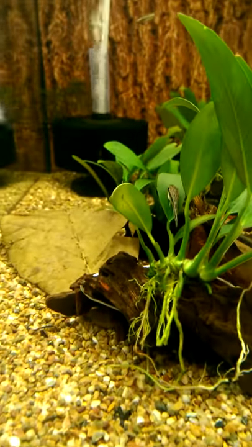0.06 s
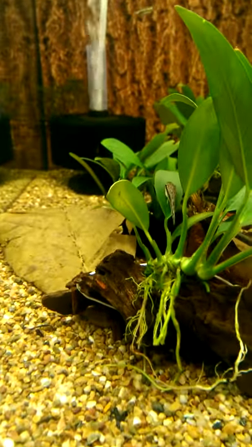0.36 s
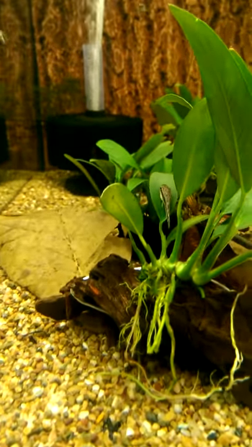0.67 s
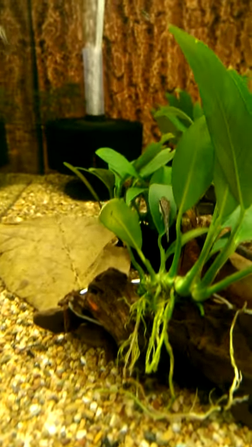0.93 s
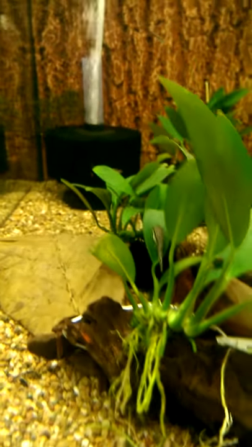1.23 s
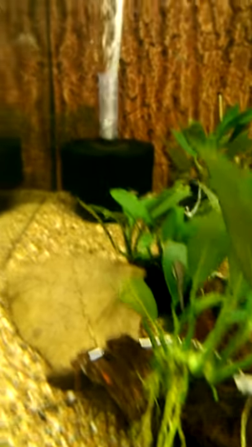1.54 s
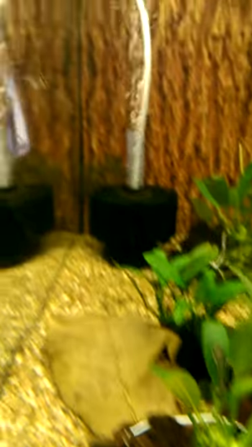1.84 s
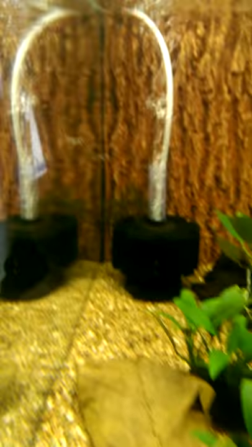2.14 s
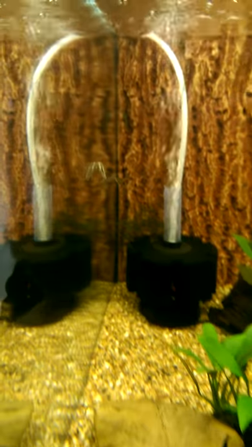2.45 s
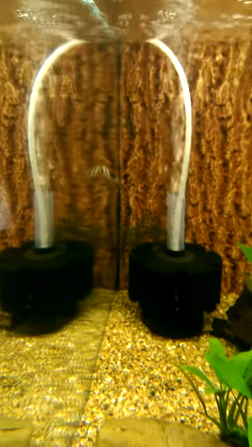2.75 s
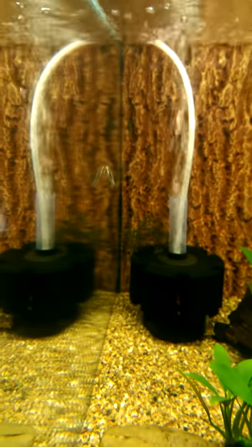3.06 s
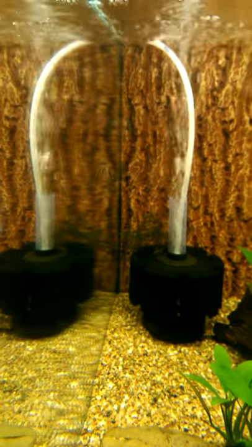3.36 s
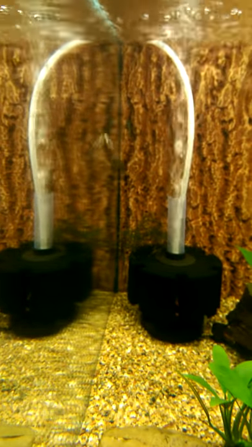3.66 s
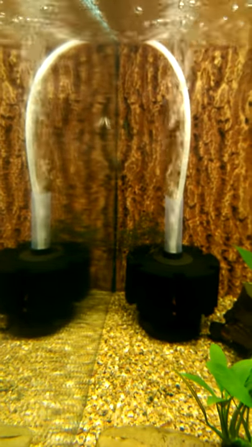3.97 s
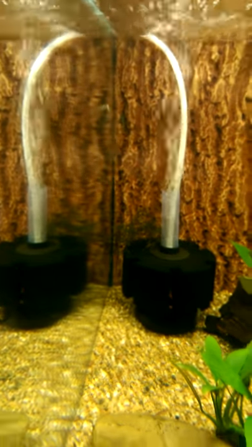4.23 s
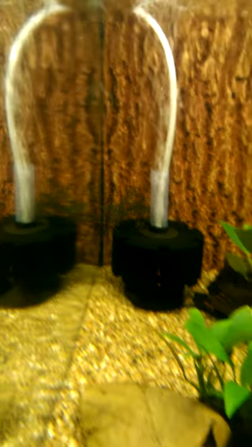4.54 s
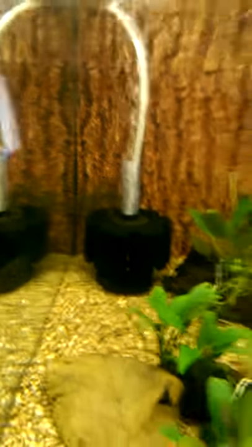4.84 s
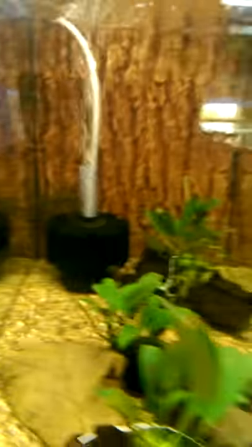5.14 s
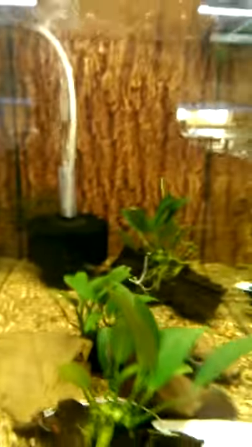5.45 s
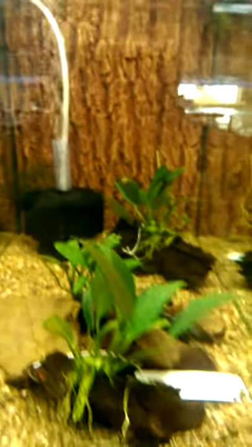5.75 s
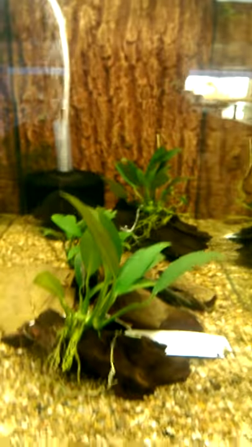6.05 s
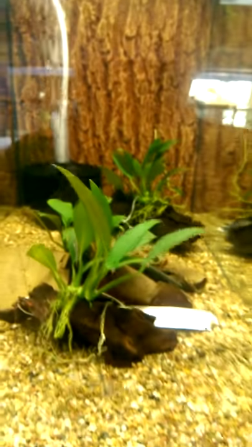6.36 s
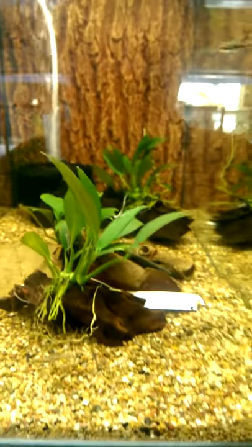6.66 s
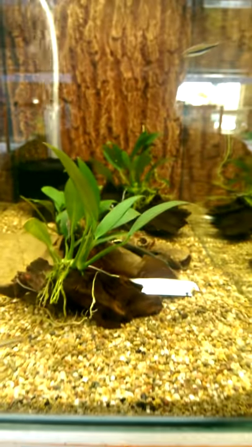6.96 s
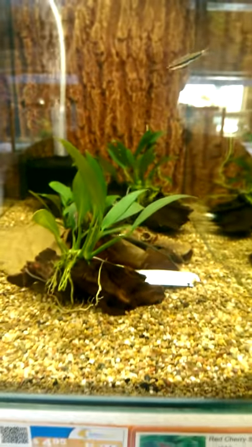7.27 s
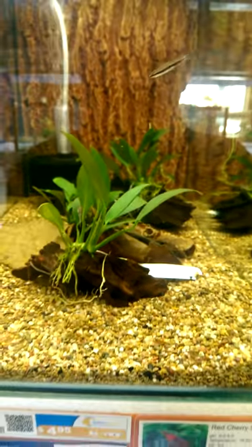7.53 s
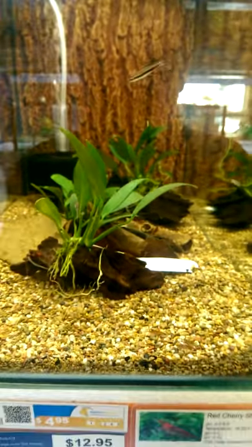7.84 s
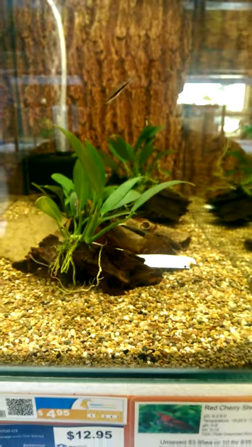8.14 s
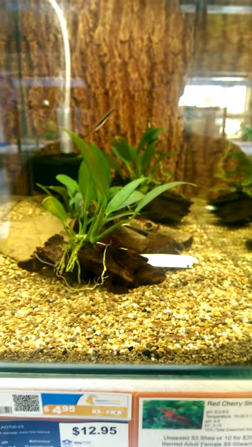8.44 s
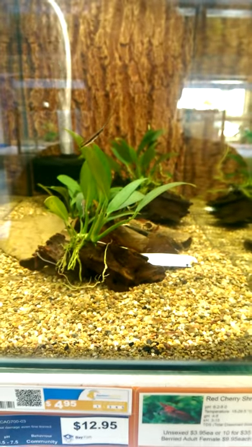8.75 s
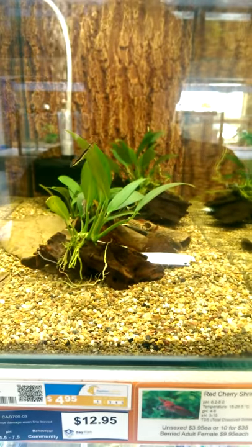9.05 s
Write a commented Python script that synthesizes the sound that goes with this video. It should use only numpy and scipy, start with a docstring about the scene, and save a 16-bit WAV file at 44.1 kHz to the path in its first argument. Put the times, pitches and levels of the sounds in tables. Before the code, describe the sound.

Continuous bubbling and soft splashing in fish tanks over a low, buzzy pump hum, with occasional finger clicks on the microphone.

```python
"""Tanks in a fish shop

Air pumps and filters hum, and their loose housings buzz. Air bubbles ring in the tanks and fizz at
the surface. A hand-held phone nears a tank's glass and draws back. A finger muffles its left
microphone port, lifts for a while and scuffs the case. Near the end a low engine note climbs,
as of a vehicle outside."""
import sys
import numpy as np
from scipy import signal
from scipy.fft import rfft, irfft, next_fast_len
from scipy.io import wavfile
from scipy.ndimage import map_coordinates

SR = 44100
rng = np.random.default_rng(int(sys.argv[2]) if len(sys.argv) > 2 else 0)


def store_pcm(level_fs):
    """Save levels as 16-bit WAV."""
    pcm = np.round(np.clip(level_fs, -1, 1) * 32767).astype(np.int16)
    wavfile.write(sys.argv[1], SR, np.atleast_2d(pcm).T)


N = 401310
TOP_HZ = 15800  # the highest pitch the phone keeps
# Tone colour of skin sliding on the phone: pitch_hz, level_db
SKIN_SPECTRUM = [(1000, -27), (3500, -13), (6000, -10), (11000, -18), (12650, -3.5), (13700, -10),
                 (16000, -12.5)]


def amp(db):
    """Turn decibels into a gain to multiply by."""
    return 10 ** (np.asarray(db) / 20)


def unit(x):
    """Scale x to an average power of 1."""
    return x / np.sqrt(np.mean(x ** 2) + 1e-20)


def clock():
    """The time of every sample, in seconds."""
    return np.arange(N) / SR


def along(points, hz):
    """Read between (pitch_hz, value) points on a logarithmic pitch scale."""
    pitches, values = np.transpose(points)
    return np.interp(np.log(hz + 1), np.log(pitches + 1), values)


def curve(points):
    """Join (time_s, value) points with straight lines, one value per sample."""
    return np.interp(clock(), *np.transpose(points))


def wobble(rate):
    """A smooth curve through `rate` random values a second."""
    return map_coordinates(rng.standard_normal(int(N * rate / SR) + 4), [clock() * rate])


def filtered(x, response):
    """Scale each frequency in x by response(hz)."""
    size = next_fast_len(N + SR // 2)
    return irfft(rfft(x, size) * response(np.fft.rfftfreq(size, 1 / SR)), size)[..., :N]


def coloured(x, spectrum):
    """Give x a tone colour, at an average power of 1."""
    return unit(filtered(x, lambda hz: amp(along(spectrum, hz))))


def diffuse(pair, spectrum):
    """Blend two noises into sound from all around: the ports hear alike only in the bass."""
    # How alike left and right are: pitch_hz, likeness (1 = the same)
    likeness = [(100, 0.79), (250, 1), (450, 0.87), (700, 0.38), (1300, 0.02), (16000, 0.15)]

    def weights(hz):
        angle = np.arccos(np.clip(along(likeness, hz), -1, 1)) / 2
        return np.array([np.cos(angle), np.sin(angle)])

    mid, side = filtered(pair, weights)
    return coloured(np.array([mid + side, mid - side]), spectrum)


def room_rumble(level_db):
    """A low, gently wavering noise fills the shop."""
    # Tone colour of the rumble: pitch_hz, level_db
    spectrum = [(15, -21), (33, -19), (46, -5), (60, -6.5), (78, -2.5), (100, -4.5), (135, -6), (180, -4.5),
                (255, -9), (330, -7.5), (420, -8), (540, -19), (900, -48.5)]
    return amp(level_db + 0.83 * wobble(5)) * diffuse(rng.standard_normal((2, N)), spectrum)


def vehicle(climb_hz_per_s):
    """A far engine gathers speed; only its two lowest tones pass the walls."""
    # How the engine swells and fades: time_s, level_db
    loudness = [(5.7, -80), (6.8, -50), (7.25, -54), (7.5, -43.5), (8.2, -54.5), (8.6, -75)]
    firing_hz = 71.4 + climb_hz_per_s * (clock() - 6.4)
    phase = 2 * np.pi * np.cumsum(firing_hz) / SR + 0.19 * wobble(8.8)
    return np.sqrt(2) * amp(curve(loudness)) * (np.sin(phase) + amp(-11.5) * np.sin(2 * phase))


def creep(ticks_per_s):
    """The grip creeps on the case in tiny ticks, louder once the hand has shifted."""
    ticks = (rng.random(N) < ticks_per_s / SR) * rng.standard_normal(N)
    level_db = curve([(4.7, -79), (5.2, -72)]) + 1.6 * wobble(10)
    return amp(level_db) * coloured(ticks, SKIN_SPECTRUM)


def stroke(peak_s, db, rise_s, fade_s):
    """A loudness curve that swells, then dies away. Every fade_s is the time to fall 60 dB."""
    t = clock()
    away = np.maximum((peak_s - t) / rise_s, (t - peak_s) / fade_s)
    return amp(db - 60 * np.minimum(away, 2))


def scuffs():
    """Skin drags on the phone: dull rubs on the case, thin hisses at the right port's rim."""
    # A finger catches and rubs: peak_s, level_db, rise_s, fade_s
    rub_strokes = [(1.296, -48, 0.03, 0.17), (1.378, -54.5, .06, 0.69), (1.497, -56, 0.11, 0.33),
                   (1.57, -60.5, .04, 0.87), (6.1, -59, 0.5, 0.79)]
    # Skin slips at the rim: peak_s, level_db, rise_s
    slip_strokes = [(2.31, -60, .01), (3.432, -63, .012), (5.65, -65, .02), (6.083, -51, 0.21)]
    # Tone colour of the rubbed case: pitch_hz, level_db
    case_spectrum = [(500, -26), (1700, -2), (2100, 2), (2560, 11), (2950, -1), (3300, -4), (3900, -7),
                     (4650, -3), (5400, -10), (6500, -16), (12000, -18)]
    grip = amp(2.0 * wobble(400))
    rubs = sum(stroke(*row) for row in rub_strokes)
    slips = sum(stroke(*row, fade_s=0.13) for row in slip_strokes)
    case_noise = coloured(rng.standard_normal(N), case_spectrum)
    skin_noise = coloured(rng.standard_normal(N), SKIN_SPECTRUM)
    return grip * (rubs * case_noise + slips * skin_noise)


def clicks(fade_s):
    """The case snaps under the grip; the smaller the contact, the thinner the click."""
    # Snaps of the case: start_s, level_db, thin_below_hz
    snaps = [(1.294, -45, 2400), (3.433, -28, 12500), (3.441, -34, 11800), (3.447, -41, 11800),
             (4.537, -31, 7500), (6.0925, -26, 2020)]
    # Tone colour of a click: pitch_hz, level_db
    spectrum = [(1000, -6), (2600, 5), (4500, 4), (7000, -2), (11000, 0), (12800, 7), (14000, 1.5),
                (16000, 0)]
    out, t = np.zeros(N + SR), np.arange(SR // 50) / SR
    for start_s, db, hz in snaps:
        snap = rng.standard_normal(len(t)) * amp(-60 * t / fade_s)
        snap /= np.linalg.norm(snap)
        thin = signal.butter(4, min(hz, TOP_HZ), "high", fs=SR, output="sos")
        out[round(start_s * SR):][:len(t)] += amp(db) * signal.sosfilt(thin, snap)
    return filtered(out[:N], lambda hz: amp(along(spectrum, hz)))


def bumps(fade_s):
    """The fingertip shifts and softly pats the left port."""
    # Fingertip pats: start_s, level_db, dull_above_hz
    pats = [(4.848, -35, 550), (4.868, -45, 500), (4.902, -52, 2600)]
    out, t = np.zeros(N), clock()
    for start_s, db, dull_hz in pats:
        thud = unit(filtered(rng.standard_normal(N), lambda hz: 1 / (1 + (hz / dull_hz) ** 3)))
        out += (t > start_s) * stroke(start_s, db, fade_s, fade_s) * thud
    return out


def tones(lines, waver_db, drift):
    """Add up steady tones that waver a little in level and phase."""
    out, t = np.zeros(N), clock()
    for hz, db in lines:
        gain = np.sqrt(2) * amp(db + waver_db * wobble(2.085))
        out += gain * np.sin(2 * np.pi * (hz * t + rng.random()) + drift * wobble(0.86))
    return out


def rattle(overtone, fade_s, knock_hz=99.975, beat_hz=11.63):
    """A loose housing knocks twice per cycle of the mains power, swayed by a slow beat."""
    # Where the housing rings: pitch_hz, width_hz, level_db
    resonances = [(1210, 110, -10), (1277, 76, 3), (1634, 120, 0)]

    def housing(hz):
        body = sum((-1) ** k * amp(db) * 1j * hz * width / (pitch ** 2 - hz ** 2 + 1j * hz * width)
                   for k, (pitch, width, db) in enumerate(resonances))
        return body / (1 + (hz / 2200) ** 6)

    knock_s = np.arange(0, N / SR, 1 / knock_hz)
    beat = 2 * np.pi * beat_hz * knock_s
    force = np.cos(beat) + np.sin(2 * beat) + overtone * (np.cos(3 * beat) + np.sin(4 * beat))
    knocks = np.bincount((knock_s * SR).astype(int), force, N)
    ring = filtered(knocks, housing)
    t = np.arange(SR // 2) / SR
    echo = rng.standard_normal((2, len(t))) * amp(-60 * t / fade_s)  # the aisles smear the knocks
    return unit(signal.fftconvolve(ring[None], echo, axes=1)[:, :N])


def pumps(buzz_db):
    """The pumps hum deeply and their housings buzz."""
    # Tones of the pumps and the mains power: pitch_hz, level_db
    hum_tones = [(25, -69), (47.4, -55.5), (50, -63), (61.6, -65.5), (76.8, -64), (88.4, -57),
                 (111.6, -43.5), (200, -61), (234.5, -56.5), (288.4, -59.5), (299.9, -66), (468.9, -73)]
    # Tones of the housings: pitch_hz, level_db
    buzz_tones = [(658.4, -70), (799.8, -77), (888.2, -68.5), (911.7, -74), (1088.1, -73), (1099.7, -71),
                  (1149.7, -69.5), (1199.7, -76), (1276.5, -73), (1288.1, -73), (1299.7, -63.5),
                  (1399.6, -66), (1499.6, -73.5), (1599.6, -68), (1699.6, -67.5), (1776.4, -83),
                  (1811.2, -78)]
    # The phone drifts through loud and quiet spots of the hum: time_s, gain_db
    hum_gain = [(0, -0.2), (1.2, 0.1), (3.5, -1.5), (5.3, -0.7), (6.8, -1.2), (8.7, -1.3)]
    hum = tones(hum_tones, waver_db=0.63, drift=0.19)
    buzz = tones(buzz_tones, waver_db=0.2, drift=0.15) + amp(-62.5) * rattle(overtone=0.31, fade_s=0.21)
    toward_left = amp([[0.5], [0]])  # where the housings stand
    return amp(curve(hum_gain)) * hum + amp(buzz_db) * toward_left * buzz


def water(splash_db, fizz_db, pops_per_s):
    """The stirred surface splashes softly and countless tiny bubbles burst on it."""
    # Tone colour of the splashing: pitch_hz, level_db
    splash_spectrum = [(300, -15.5), (520, -3.5), (680, 2.5), (820, 1.3), (1000, -1.5), (1320, 3),
                       (1450, -0.9), (1680, -0.5), (2200, -8), (3000, -15.5), (4000, -26.5), (8000, -49)]
    # Tone colour of the bursting bubbles: pitch_hz, level_db
    fizz_spectrum = [(400, -10), (1500, 5), (2400, 3.5), (3500, 0.4), (4600, 2), (6000, -6.5), (8000, -13),
                     (10500, -19), (11600, -11), (12700, -6.5), (14200, -10), (16000, -24)]
    splash = amp(splash_db + 0.26 * wobble(10)) * diffuse(rng.standard_normal((2, N)), splash_spectrum)
    pops = (rng.random((2, N)) < pops_per_s / SR) * rng.standard_normal((2, N))
    fizz = diffuse(rng.standard_normal((2, N)) + 0.5 * unit(pops), fizz_spectrum)
    return splash + amp(fizz_db + 0.58 * wobble(8.9)) * fizz


def bubble(hz, fade_s):
    """A pocket of air rings for a moment in the tank."""
    t = np.arange(SR // 3) / SR
    return np.sin(2 * np.pi * hz * t) * amp(-60 * t / fade_s) * (1 - np.exp(-t / 0.02))


def gurgle(centre_hz, scatter, fade_s, count):
    """Bubbles leave the air tubes at random moments and ring at nearly one pitch."""
    starts = (rng.random(count) * N).astype(int)
    pitch_hz = centre_hz * np.exp(scatter * rng.standard_normal((count, 1)))
    rings = rng.uniform(0.64, 1, (count, 1)) * bubble(pitch_hz, fade_s)
    positions = starts[:, None] + np.arange(rings.shape[1])
    return unit(np.bincount(positions.ravel(), rings.ravel(), N)[:N])


def gulps(fade_s, gain_db):
    """Now and then a larger bubble stands out."""
    # The largest gulps of air: start_s, level_db, pitch_hz
    large_bubbles = [(0.193, -37, 348), (0.441, -38.5, 358), (0.78, -44, 367), (1.06, -36.5, 359),
                     (1.47, -40.5, 364), (1.729, -36, 340), (2.62, -41.5, 333), (3.511, -40.5, 331),
                     (4.22, -39, 364), (4.61, -41, 338), (4.835, -36, 357), (5.136, -43, 367),
                     (5.434, -43, 338), (5.445, -54, 616), (5.847, -36.5, 355), (6.12, -42, 368),
                     (6.195, -36.5, 353.7), (6.265, -42, 355), (6.378, -41, 368.4), (6.611, -40.5, 323),
                     (6.648, -50, 612), (6.654, -40.5, 371), (6.84, -46, 340), (7.469, -36.5, 352),
                     (8.837, -37.5, 367)]
    out = np.zeros(N + SR)
    for start_s, db, hz in large_bubbles:
        ring = bubble(hz, fade_s)
        out[round(start_s * SR):][:len(ring)] += amp(db + gain_db) * ring / np.abs(ring).max()
    return out[:N]


def by_glass(x, depth_db):
    """Sound bouncing off the glass weakens a band of pitches, lower as the phone backs away."""
    # From the phone to the tank's glass: time_s, distance_m
    distances = [(0, 0.025), (1.4, 0.019), (2, 0.029), (2.6, 0.021), (3.5, 0.017), (4.4, .021),
                 (4.75, 0.023), (5.1, .045), (5.6, 0.083), (6.5, .098), (7.3, 0.11), (9.1, 0.1)]
    hz, t, slices = signal.stft(x, SR, nperseg=512)
    distance_m = np.interp(t, *np.transpose(distances))
    half_waves = 4 * hz[:, None] * distance_m / 343  # there and back, at 343 m/s
    gain = amp(depth_db * (np.sinc(half_waves) - 1))
    return signal.istft(slices * gain, SR, nperseg=512)[1][:, :N]


def under_finger(x, lift_db, leak_db, open_port_hz=3230):
    """A finger muffles the port; as it lifts, more treble gets in and the hollow below rings higher."""
    # What the gap under the finger lets through: time_s, dull_above_hz
    gap = [(0, 182), (4.6, 153), (4.98, 174), (5.14, 510), (5.33, 636), (5.48, 1400), (5.58, 590),
           (5.775, 620), (5.81, 2800), (5.92, 4400), (6.06, 10200), (6.28, 2100), (6.67, 865), (6.75, 450),
           (7.1, 245), (9.1, 101)]
    hz, t, slices = signal.stft(x, SR, nperseg=1024)
    hz = hz[:, None]
    gap_s, gap_hz = np.transpose(gap)
    dull_hz = np.exp(np.interp(t, gap_s, np.log(gap_hz)))
    hollow_hz = open_port_hz * dull_hz / (dull_hz + 690)
    through = amp(lift_db) / (1 + 1j * hz / dull_hz - (hz / hollow_hz) ** 2)
    leak = amp(leak_db) / (1 + 1j * hz / 3500) * hz / (hz + 1800)  # a little always slips past
    return signal.istft(slices * (through - 1j * leak), SR, nperseg=1024)[1][:N]


def scene():
    """The shop and the hand, as heard at the phone's left and right ports."""
    t = clock()
    far = np.clip(1 - t / 2.6, 0, 1)  # the phone first drifts closer to the housings
    facing = np.exp(-((t - 3.64) / 0.72) ** 2)  # it faces the filters, where the bass is weaker
    turned = np.clip((t - 5.2) / 0.38 + 0.5, 0, 1)  # then it swings away from the housings
    bass_db = -1.0 * facing
    buzz_db = 2.5 - 3 * far - 2.5 * turned
    rumble = room_rumble(level_db=-46.5 + bass_db)
    big = amp(-52.5 + bass_db) * gurgle(centre_hz=359.9, scatter=0.0311, fade_s=0.26, count=700)
    small = amp(-64.5) * gurgle(centre_hz=674.5, scatter=0.051, fade_s=0.13, count=700)
    surface = water(splash_db=-51.0, fizz_db=-56.0, pops_per_s=1500)
    tanks = big + gulps(fade_s=0.25, gain_db=-4.0) + small + surface
    shop = rumble + pumps(buzz_db) + tanks + vehicle(climb_hz_per_s=8.5)
    left, right = by_glass(shop, depth_db=4.0)
    hand = scuffs() + clicks(fade_s=0.0038)
    through_case = amp(-17.5) * filtered(hand, lambda hz: 1 / (1 + (hz / 9500) ** 6))
    left = under_finger(left, lift_db=4, leak_db=-21) + bumps(fade_s=0.04) + through_case
    return np.array([left, right + hand + creep(ticks_per_s=300)])


def record(dry):
    """The phone adds its own faint hiss and cuts off the highest treble."""
    # Tone colour of the hiss: pitch_hz, level_db
    spectrum = [(100, -29), (1000, 2), (3000, 3.5), (8000, 0.5), (16000, -2.5)]
    hiss = amp([[-66.5], [-73]]) * coloured(rng.standard_normal((2, N)), spectrum)
    return filtered(dry + hiss, lambda hz: hz < TOP_HZ)


dry = scene()
out = record(dry)
store_pcm(out)
```